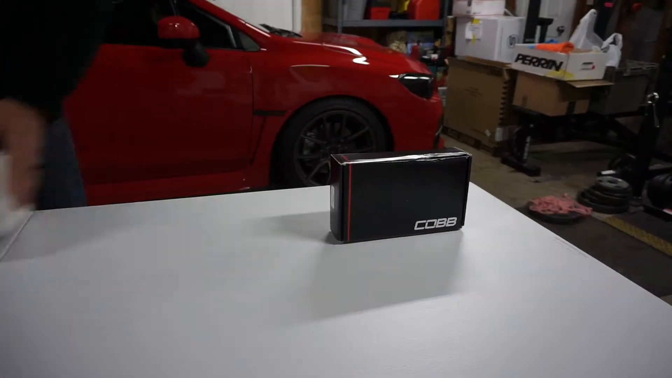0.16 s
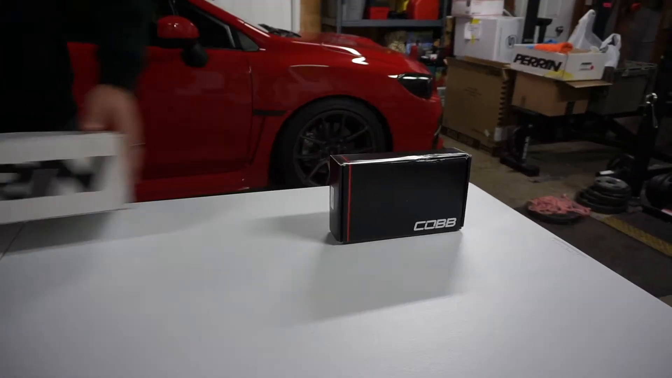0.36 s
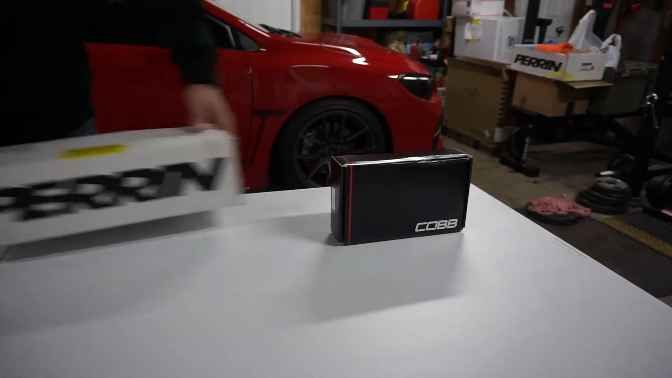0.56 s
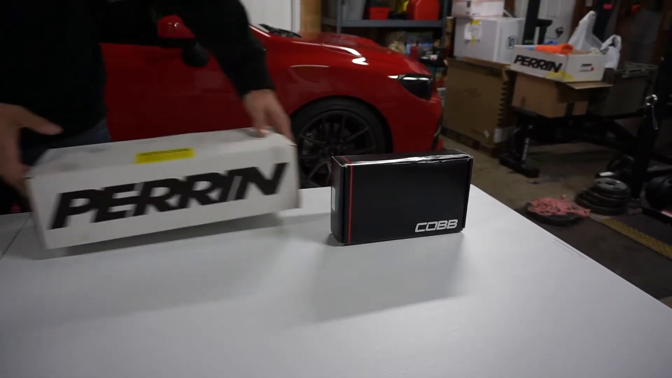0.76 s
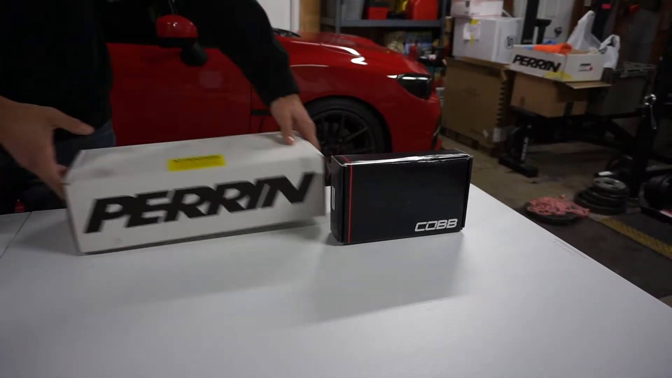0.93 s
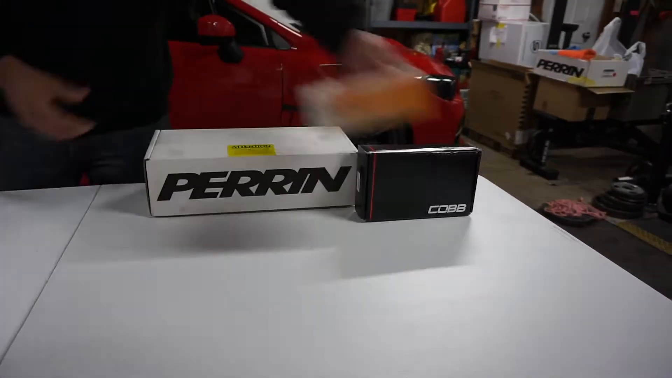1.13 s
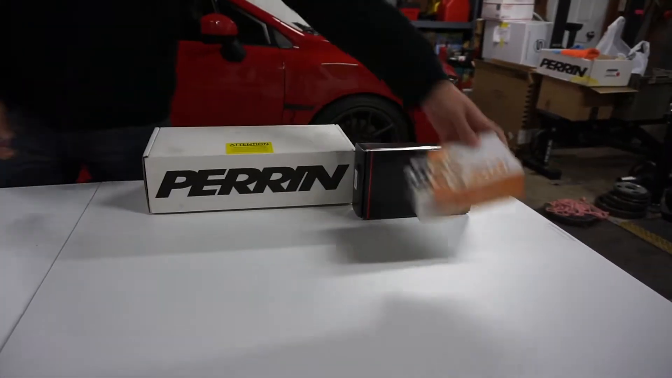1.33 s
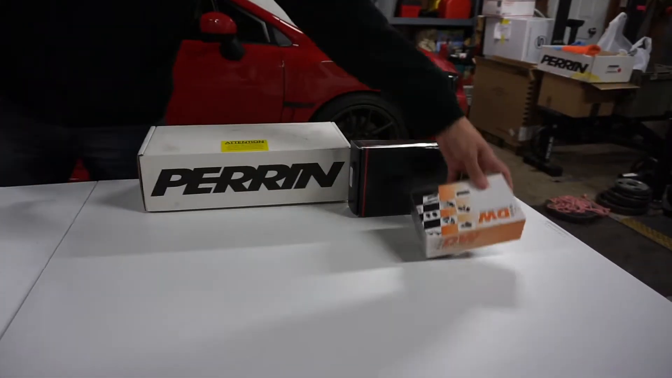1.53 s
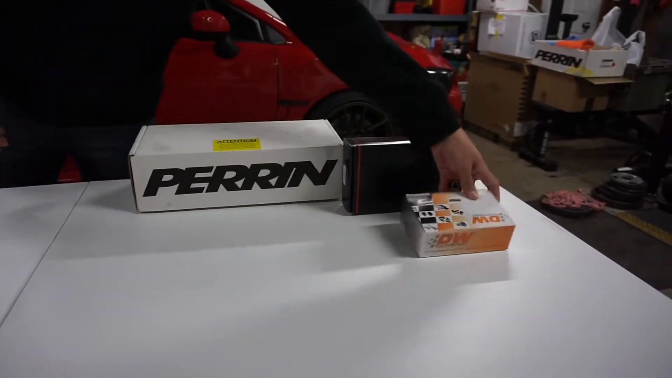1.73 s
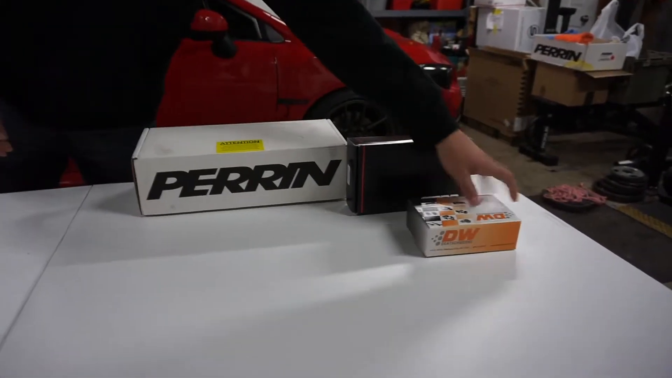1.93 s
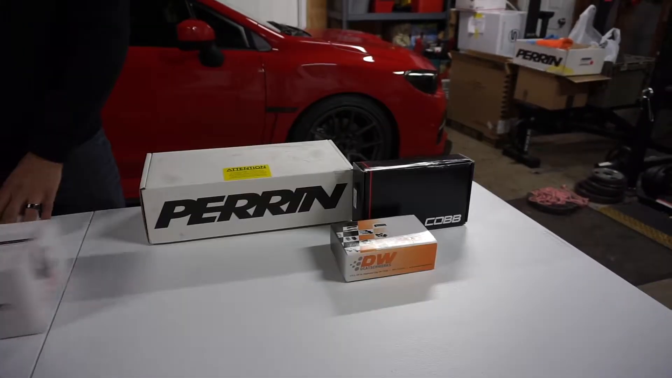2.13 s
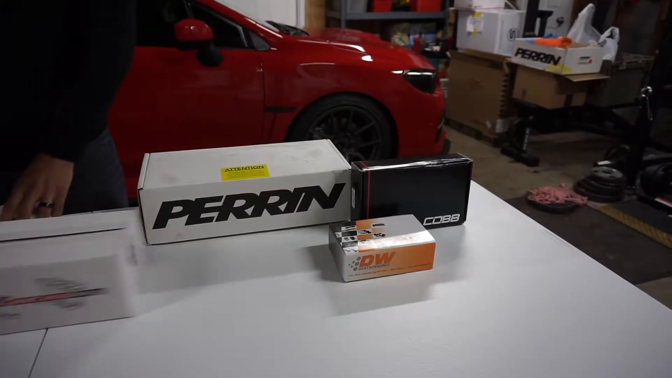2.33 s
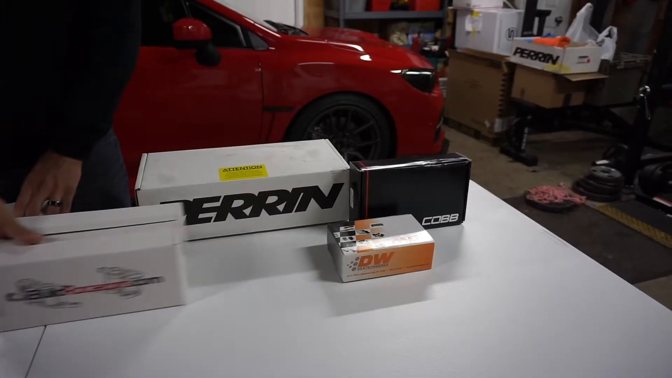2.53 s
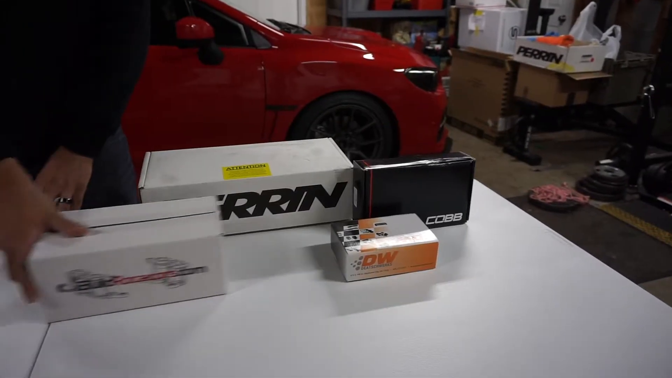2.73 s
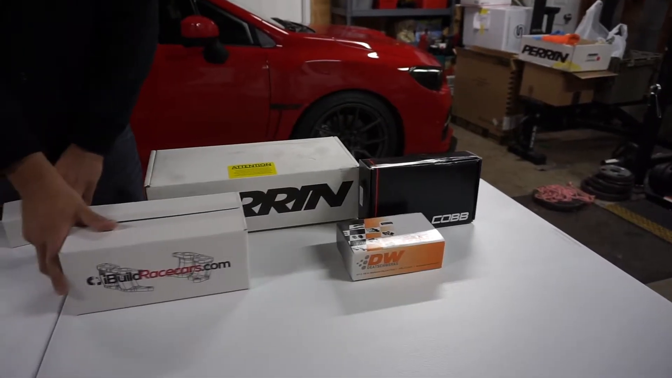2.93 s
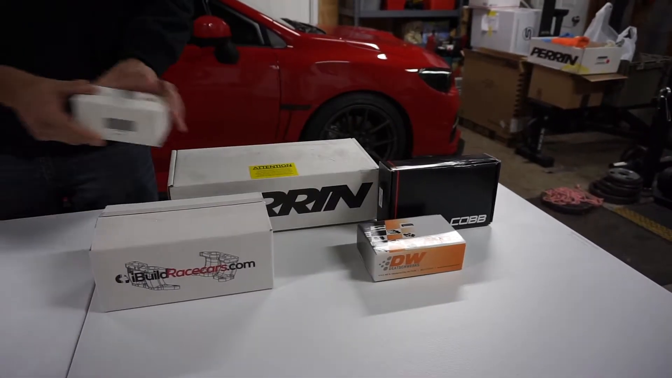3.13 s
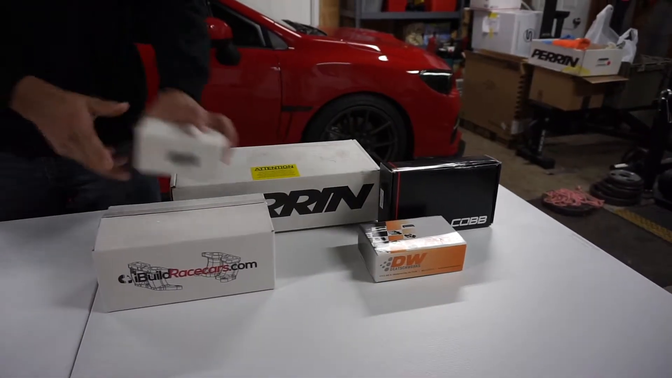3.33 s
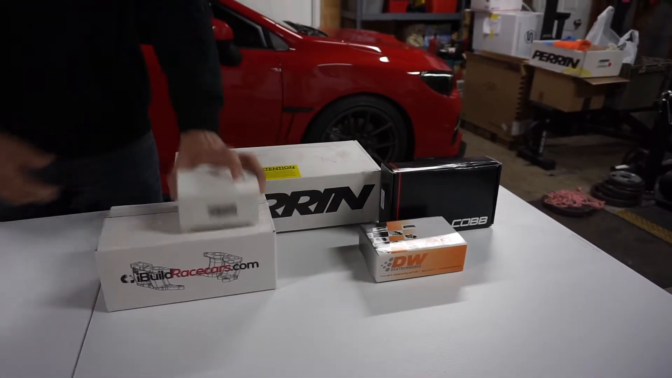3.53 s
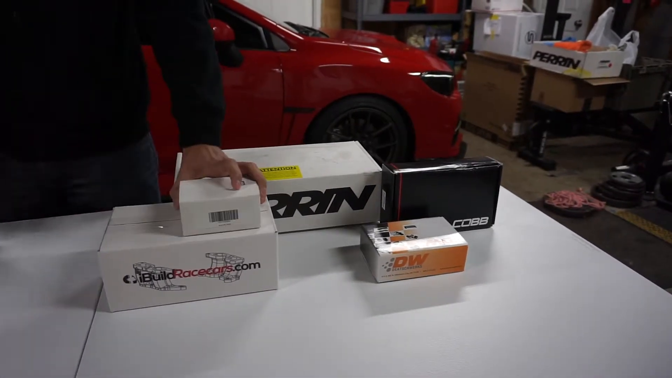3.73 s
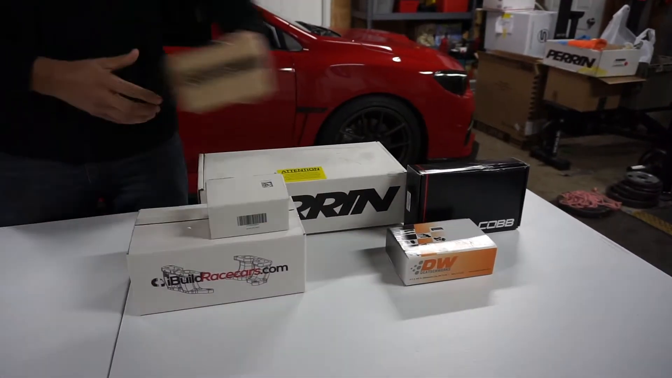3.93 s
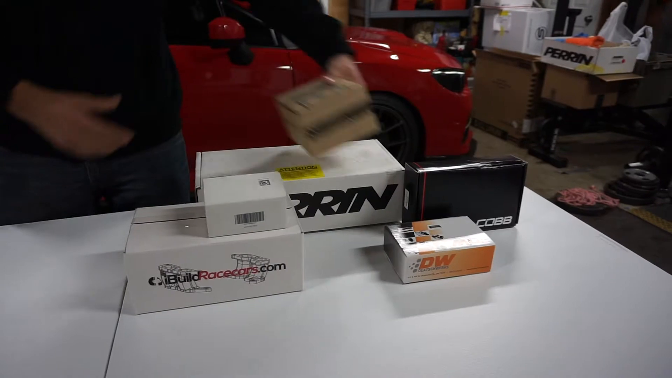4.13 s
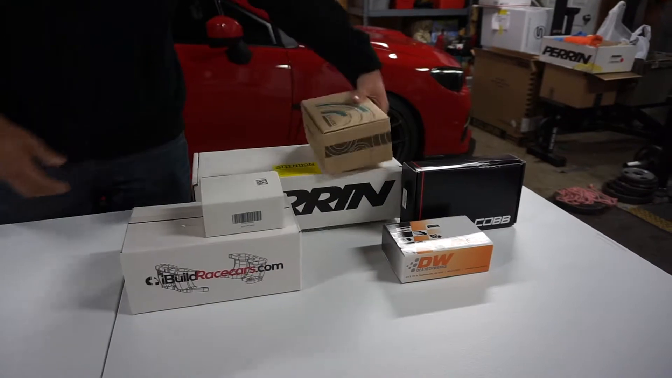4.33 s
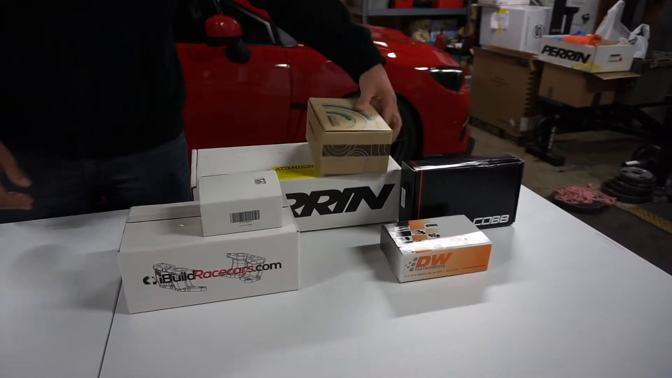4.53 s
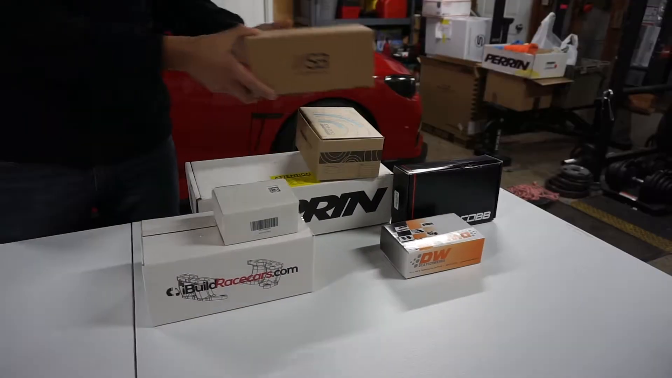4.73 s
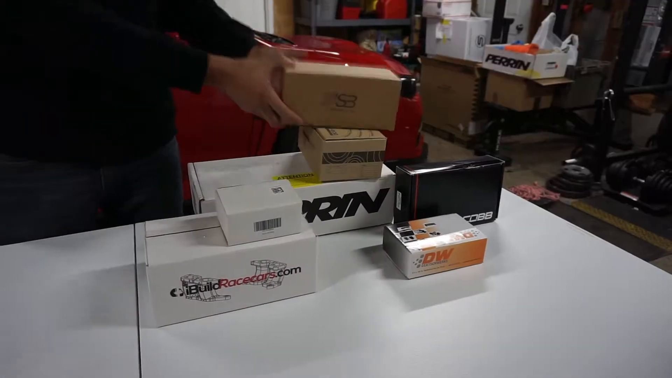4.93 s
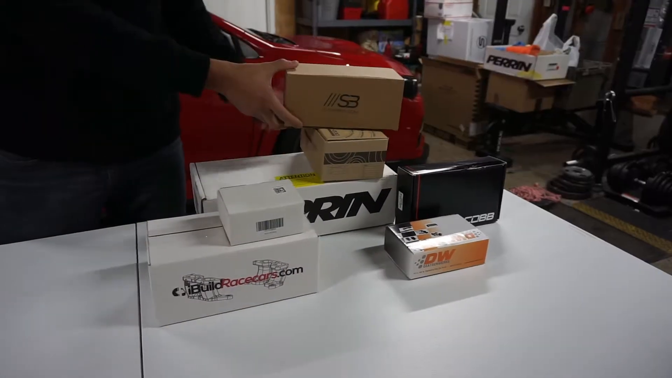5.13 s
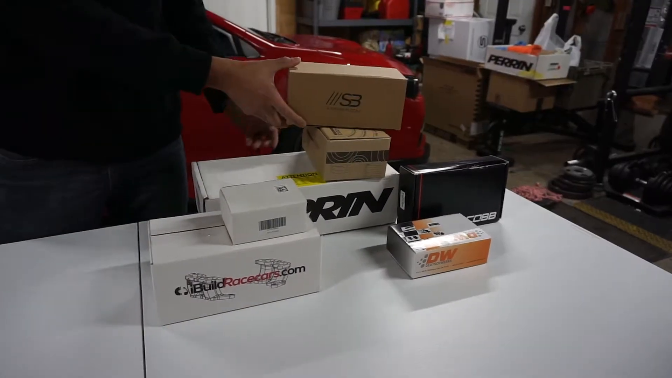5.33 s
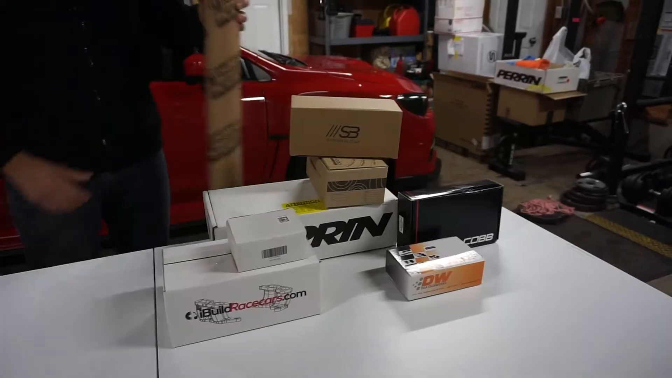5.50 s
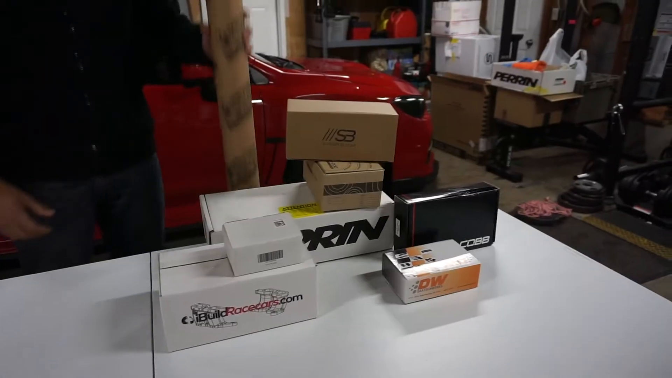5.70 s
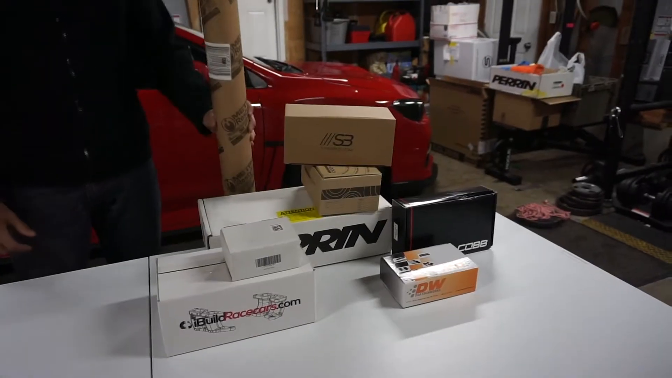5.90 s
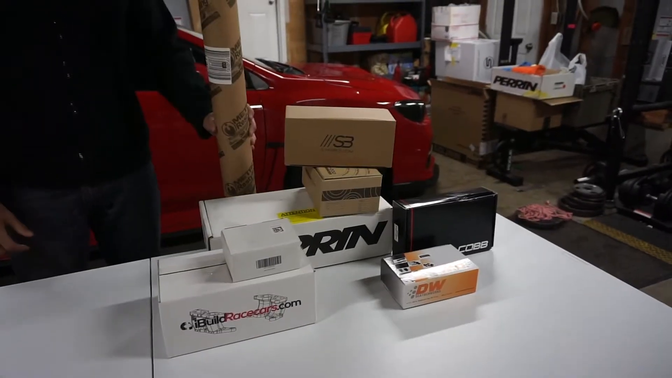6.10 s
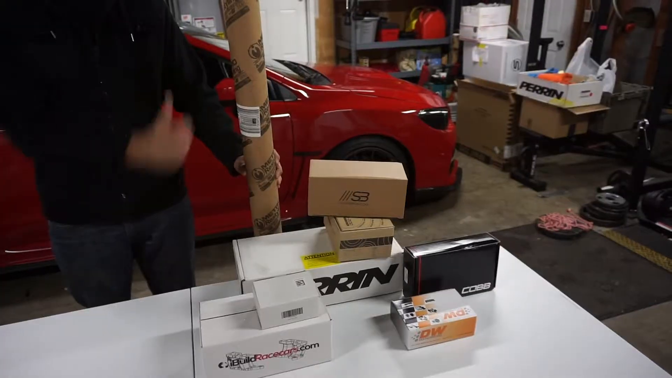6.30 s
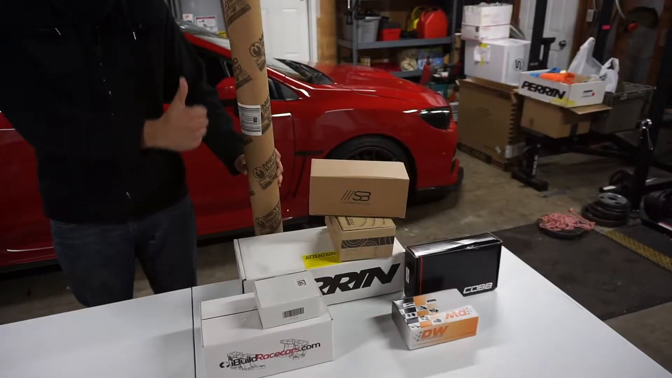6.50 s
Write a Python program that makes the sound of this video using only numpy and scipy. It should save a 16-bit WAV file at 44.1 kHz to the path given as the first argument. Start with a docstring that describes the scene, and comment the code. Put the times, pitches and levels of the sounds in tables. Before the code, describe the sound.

A cardboard box knocks down on a folding table right at the start, in a quick cluster of contacts slightly to the right. A softer one lands on the left at 1 second, and a third thuds at 1.6 and knocks sharply at 1.8. From about 2.1 seconds a box is shoved across the top on the left, hissing and juddering as it slows, then drops flat with a loud thud at 2.8. Another lands with a double knock at 3.6. Lighter bumps and rubbing run from 4.3 to 4.6, and a firm knock with a tiny squeak comes at 5. At 5.9 a long cardboard tube is stood on end, rocking briefly with a hollow boom that fades. Fingers lightly tap, flick and rub the card between blows. Everything is heard nearby in stereo, with short garage reflections and faint steady room air.

```python
"""Cardboard boxes put down one by one on a folding table in a garage, heard in stereo from nearby.
Each lands edge by edge, its walls ringing and buzzing, and the big ones rock before they settle.
One is shoved across the top, hissing and juddering as it slows, until it drops flat. A long cardboard
tube is stood on end and its air column booms. Between the blows hands tap and rub the card;
behind them are the reflections of the garage and its faint air."""
import sys
import numpy as np
from scipy import signal
from scipy.fft import rfft, irfft, next_fast_len
from scipy.io import wavfile
from scipy.ndimage import uniform_filter1d

SR = 44100
rng = np.random.default_rng(int(sys.argv[2]) if len(sys.argv) > 2 else 0)


def to_wav(sig):
    """Store sig (one row per channel, or 1-D mono) as 16-bit WAV at the path in sys.argv[1].

    Samples outside -1..1 are clipped; the rate is SR.
    """
    pcm = np.clip(np.atleast_2d(sig), -1, 1) * 32767
    pcm = np.round(pcm).astype(np.int16)
    wavfile.write(sys.argv[1], SR, pcm.T)  # frames by channels


N = 289204
TIME = np.arange(N) / SR
CUTOFF_HZ = 11150

# an edge, a face or a finger touches down: t/s, object, knock peak/dB, thud/dB, crack/dB
TOUCHDOWNS = [(0.002, "black", -27.5, -29.5, -48), (0.02, "black", -22.5, -43, -54.5),
              (0.087, "black", -20, -42, -43.5), (0.131, "black", -25, -53, -69),
              (0.205, "black", -36.5, -67, -62), (0.444, "finger", -52, -49, -78),
              (0.612, "finger", -34, -65, -57.5), (0.979, "long", -38, -31, -49.5),
              (0.991, "long", -26, -32, -49), (1.316, "finger", -43.5, -49, -63),
              (1.444, "finger", -45, -48, -60), (1.475, "finger", -51, -62, -59.5),
              (1.6, "glossy", -24.5, -24.5, -48.5), (1.645, "glossy", -53, -35, -76),
              (1.755, "glossy", -13.5, -34, -28.5), (1.825, "glossy", -23, -35, -49),
              (1.842, "glossy", -28.5, -31, -47), (2.7934, "wide", -15, -18.5, -30),
              (3.16, "finger", -45, -64, -62), (3.5855, "small", -15, -23, -42),
              (3.622, "small", -17, -24.5, -46.5), (3.904, "finger", -65, -68, -55),
              (4.302, "brown", -34, -32, -54.5), (4.381, "brown", -33.5, -34, -53.5),
              (4.452, "brown", -26.5, -60, -45.5), (4.538, "brown", -23.5, -31.5, -40),
              (4.557, "brown", -25, -39, -46.5), (4.63, "brown", -28, -32, -74),
              (4.98, "top", -19, -27.5, -31.5), (4.99, "top", -21.5, -26.5, -38.5),
              (5.9044, "tube", -14.5, -22.5, -31.5), (6.381, "finger", -59, -72, -67.5),
              (6.469, "finger", -49, -60, -58)]


def contacts(name):
    """One object's contacts: t/s, knock/dB, thud/dB, crack/dB."""
    return [(s, *levels) for s, who, *levels in TOUCHDOWNS if who == name]


# the modes each box rings with: f/Hz, level/dB, t60/s
BLACK_MODES = [(204, -7, 0.085), (333, -14, 0.12), (499, 6.5, 0.042), (588, -5.5, 0.092), (915, -6, 0.047),
               (1365, -15, 0.054), (2160, -4.5, 0.017)]
LONG_MODES = [(95, -26, 0.069), (198, -2.5, 0.13), (367, -5, 0.036), (580, -2, 0.03), (950, -2.5, 0.023)]
GLOSSY_MODES = [(127.5, -6.5, 0.32), (198, -2, 0.11), (406, 2.5, 0.029), (570, 4, 0.033), (903, 1, 0.021),
                (1430, -5, 0.015), (2470, 0.5, 0.011), (2760, 4, 0.012), (2880, -19, .14),
                (3920, -2, 0.0094)]
WIDE_MODES = [(138.7, 4.5, 0.12), (208, -0.5, 0.15), (318, -7, 0.055), (489, 0, 0.046), (650, 1, 0.1),
              (883, -7, 0.09)]
SMALL_MODES = [(186, -24, 0.11), (250, -3.5, 0.084), (354, 2, 0.069), (515, 0.5, 0.074), (845, -8, .04),
               (997, -9, 0.086), (2520, -19, 0.013)]
BROWN_MODES = [(114, -4.5, 0.04), (188, -1, 0.051), (296, -7, 0.042), (404, -4.5, 0.097), (558, 0.5, 0.039),
               (852, -2, 0.037)]
TOP_MODES = [(109, -9, 0.19), (194, -5.5, 0.075), (284, -10, 0.033), (477, -5, 0.056), (740, -19, 0.024),
             (1254, 1, 0.027), (1680, -27, 0.016)]
# the dense buzz of each box's walls: f/Hz, level/dB
BLACK_BUZZ = [(60, -1), (190, 4), (350, -7), (520, -3.5), (850, -15.5), (1700, -21), (2400, -18.5),
              (5000, -31.5), (10500, -29.5)]
LONG_BUZZ = [(50, -11), (130, 10), (200, -1), (330, -8.5), (600, -18), (1400, -23.5), (2700, -20.5),
             (5500, -33.5), (10500, -31)]
GLOSSY_BUZZ = [(55, -14), (130, 1), (270, -0.5), (500, -1), (1000, -12), (1900, -18.5), (2900, -19),
               (3600, -23.5), (6000, -32.5), (10500, -28)]
WIDE_BUZZ = [(45, -18), (135, -7), (260, -2), (600, -13), (1000, -20), (1500, -24.5), (2600, -22.5),
             (4000, -33), (6000, -35.5), (10500, -33)]
SMALL_BUZZ = [(60, -21), (120, -3.5), (180, -3), (250, 4), (340, -3.5), (540, -4.5), (750, -16),
              (1050, -16), (1600, -20.5), (2500, -27.5), (4500, -35.5), (10500, -35)]
BROWN_BUZZ = [(50, -6), (130, -2), (300, 2), (600, -6.5), (1300, -16.5), (2300, -15.5), (5000, -31),
              (10500, -28.5)]
TOP_BUZZ = [(45, -17), (90, 0), (200, 1.5), (450, -5.5), (800, -8.5), (1500, -17.5), (2700, -23),
            (5500, -36), (10500, -34)]


def boxes():
    """Seven boxes land in turn, left and right of the microphone; some of their tails stop short."""
    long_hits = rocking(contacts("long"), count=3, gap_s=0.0125, softer_db=(8, 6, -1), loss_db=2)
    wide_hits = rocking(contacts("wide"), count=3, gap_s=0.0163, softer_db=(8, 5.5, 12), loss_db=0.3)
    top_hits = rocking(contacts("top"), count=3, gap_s=0.0275, softer_db=(8.5, 1.5, 4), loss_db=2)
    black = blows(contacts("black"), BLACK_MODES, BLACK_BUZZ, buzz_db=-4.5, buzz_t60=0.11,
                  crack_t60=0.096, crest_db=10, pan_db=-2.5, lead_ms=-0.022, give_s=0.00067)
    long = blows(long_hits, LONG_MODES, LONG_BUZZ, buzz_db=0.5, buzz_t60=0.046,
                 crack_t60=0.13, crest_db=9.5, pan_db=4.5, lead_ms=0.1, give_s=0.00091)
    glossy = blows(contacts("glossy"), GLOSSY_MODES, GLOSSY_BUZZ, buzz_db=2, buzz_t60=0.087,
                   crack_t60=0.015, crest_db=9.5, pan_db=-3.2, lead_ms=-0.024, give_s=0.00049)
    wide = blows(wide_hits, WIDE_MODES, WIDE_BUZZ, buzz_db=0.5, buzz_t60=0.085,
                 crack_t60=0.075, crest_db=8.5, pan_db=6, lead_ms=0.068, give_s=0.00077)
    small = blows(contacts("small"), SMALL_MODES, SMALL_BUZZ, buzz_db=-2.5, buzz_t60=0.095,
                  crack_t60=0.12, crest_db=10, pan_db=3, lead_ms=0.03, give_s=0.0009, lowest_hz=55)
    brown = blows(contacts("brown"), BROWN_MODES, BROWN_BUZZ, buzz_db=0, buzz_t60=0.12,
                  crack_t60=0.074, crest_db=8.5, pan_db=-1, lead_ms=0.0035, give_s=0.00094)
    top = blows(top_hits, TOP_MODES, TOP_BUZZ, buzz_db=6.5, buzz_t60=0.093,
                crack_t60=0.11, crest_db=8, pan_db=-1.7, lead_ms=0.0081, give_s=0.0009)
    return (in_garage(black, BLACK_BUZZ, wet_db=-5.5, bass_db=-2) * until(0.236)
            + in_garage(long, LONG_BUZZ, wet_db=-3, bass_db=-2) * until(1.137)
            + in_garage(glossy, GLOSSY_BUZZ, wet_db=-2.5, bass_db=-6)
            + in_garage(wide, WIDE_BUZZ, wet_db=-3, bass_db=-5.5) * until(3.073)
            + in_garage(small, SMALL_BUZZ, wet_db=-6.5, bass_db=-1)
            + in_garage(brown, BROWN_BUZZ, wet_db=-3.5, bass_db=-5) * until(4.673)
            + in_garage(top, TOP_BUZZ, wet_db=-2, bass_db=-1.5))


def blows(hits, modes, walls, buzz_db, buzz_t60, crack_t60, crest_db, pan_db, lead_ms, give_s,
          lowest_hz=40, spread_db=3):
    """Each contact rings the modes and buzzes the walls; a flat landing thuds, a corner cracks."""
    t, out = TIME[:SR // 4], np.zeros((2, N + SR))
    hz, mode_db, t60 = np.transpose(modes)[:, :, None]
    ringing = np.sin(2 * np.pi * hz * t) * from_db(mode_db - 60 * t / t60)
    pressed = 1 - np.exp(-t / give_s)   # card gives way, so the force takes a moment to build
    for s, knock_db, thud_db, crack_db in hits:
        ring = from_db(spread_db * rng.standard_normal(len(modes))) @ ringing
        buzz = from_db(buzz_db) * coloured(rng.standard_normal(len(t)), walls)
        thud = (lowest_hz, 300, thud_db, buzz_t60, 0)
        knock = (300, 1500, knock_db - crest_db, buzz_t60, pan_db / 2)
        crack = (1500, 12000, crack_db, crack_t60, pan_db)
        start = round(s * SR)
        for low_hz, high_hz, level_db, decay_s, pan in (thud, knock, crack):
            vibration = pressed * (buzz * from_db(-60 * t / decay_s) - ring)
            part = bandpass(vibration, low_hz, high_hz, order=3)
            part *= from_db(level_db) / np.sqrt(np.mean(part[:SR // 33] ** 2))   # rms of the first 30 ms
            out[:, start:start + len(t)] += placed(part, pan, lead_ms)
    return out[:, :N]


def rocking(hits, count, gap_s, softer_db, loss_db):
    """After its last contact the object rocks in evenly spaced rebounds, losing loss_db each time."""
    s, *levels = hits[-1]
    rebound_db = np.subtract(levels, softer_db)   # knock, thud, crack
    return hits + [(s + gap_s * (k + 1), *(rebound_db - loss_db * k)) for k in range(count)]


# the modes of the tube's card: f/Hz, level/dB, t60/s
TUBE_MODES = [(125, -27, .09), (192, 6, 0.059), (274, -4.5, 0.2), (319, -5.5, 0.3), (497, -3, 0.058),
              (737, -1, 0.049), (1170, -16, 0.074)]
# the buzz of its wall: f/Hz, level/dB
TUBE_BUZZ = [(55, -27), (100, -5), (185, -4), (240, -5), (310, 3.5), (480, -12), (750, -13), (1400, -13),
             (1900, -21.5), (2700, -18), (4500, -29), (7000, -37.5), (10500, -39)]


def tube():
    """The tube is stood on end a little to the left, rocks and booms."""
    hits = rocking(contacts("tube"), count=5, gap_s=0.02, softer_db=(9.5, 9, 6), loss_db=0)
    card = blows(hits, TUBE_MODES, TUBE_BUZZ, buzz_db=-2, buzz_t60=0.19,
                 crack_t60=0.031, crest_db=6.5, pan_db=2.5, lead_ms=0.032, give_s=0.00023, lowest_hz=100)
    return (in_garage(card, TUBE_BUZZ, wet_db=2, bass_db=-1) + boom()) * until(6.208)


# the modes of the air inside the tube: f/Hz, level/dB, t60/s
AIR_COLUMN = [(290.8, -15.5, 0.44), (329, -25, 0.57)]


def boom(build_s=0.012):
    """The landing pumps the tube's air column, which swells to a hollow note and dies away."""
    landing_s = contacts("tube")[0][0]
    t = np.maximum(TIME - landing_s, 0)
    note = sum(np.sin(2 * np.pi * hz * t) * from_db(db - 60 * t / t60) for hz, db, t60 in AIR_COLUMN)
    return -note * (1 - np.exp(-t / build_s))


# sliding card, the grind of its body and the hiss of its edge: f/Hz, level/dB
GRIND_SPECTRUM = [(45, -19), (100, -7.5), (300, -10.5), (550, -11), (800, -15.5), (1400, -21),
                  (2000, -22.5), (2700, -22), (4200, -28.5), (6000, -33), (11000, -29.5)]
HISS_SPECTRUM = [(1200, -12), (2500, -10.5), (4500, -7), (7000, -5.5), (9000, -0.5), (11000, -0.5)]


def slide(start_s=2.069, stop_s=2.8, slowing_s=0.488):
    """Card shoved over plastic, on the left: grind and hiss fade as it slows, while its edge rings."""
    speed = np.exp(-np.maximum(TIME - start_s, 0) / slowing_s)
    moving = until(stop_s) * (1 - until(start_s))
    chatter_times = 2.18 + np.cumsum([0, 0.033, 0.2, 0.1])   # a hard spell: attack, hold, release
    chatter = np.interp(TIME, chatter_times, [0, 1, 1, 0])
    grind = speed * from_db(-28) * friction(GRIND_SPECTRUM, grain_db=2)
    hiss_db = -32 - 5.5 * chatter   # a hopping box hisses less
    hiss = speed * from_db(hiss_db) * friction(HISS_SPECTRUM, grain_db=1.5)
    scrape = friction(GRIND_SPECTRUM, grain_db=5.5)
    edge = from_db(-45.5) * rms_one(resonance(scrape, hz=2630, width_hz=410))
    rubbing = placed(grind + edge, pan_db=2.5, lead_ms=0.1) + placed(hiss, pan_db=7.5, lead_ms=0.057)
    in_room = in_garage(rubbing * moving, GRIND_SPECTRUM, wet_db=-5.5) * until(3.073)
    return in_room + judder(speed, chatter) * moving


def judder(speed, chatter, full_speed_hz=156, light_db=-42, chatter_db=16, wobble_db=2):
    """The box sticks and slips ever more slowly, and each slip shakes the table top."""
    slip_hz = full_speed_hz * speed * (1 + 0.0302 * drift(60))
    slips = np.diff(np.floor(np.cumsum(slip_hz) / SR), prepend=0)
    shake = resonance(slips + 1e-18, hz=116, width_hz=66)
    shake /= np.sqrt(uniform_filter1d(shake ** 2, size=2000) + 1e-12)   # even level at any slip rate
    return shake * from_db(light_db + chatter_db * chatter + wobble_db * drift(30))


def friction(spectrum, grain_db):
    """Fibres catch and let go in tiny uneven bursts."""
    noise = rng.standard_normal(N)
    bursts = from_db(grain_db * drift(900) + grain_db / 2 * drift(70))
    return coloured(noise * bursts, spectrum)


# fingernails and flaps flick the card: t/s, level/dB
FLICKS = [(0.81, -41), (1.0392, -36), (1.8263, -36.5), (3.051, -32.5), (3.303, -30.5), (3.3222, -28.5)]


def snaps(edge_t60=0.0076, flick_t60=0.017, rise_s=0.00061, over_crack_db=11, ceiling_db=-27):
    """Struck edges and flicks: bursts of a few milliseconds, as bright as the hiss of sliding card."""
    t, out = TIME[:SR // 16], np.zeros((2, N))
    edges = [(s, min(crack_db + over_crack_db, ceiling_db), edge_t60, 0)
             for s, *_, crack_db in TOUCHDOWNS]
    flicks = [(s, level_db, flick_t60, 4.5) for s, level_db in FLICKS]
    for s, level_db, t60, pan_db in edges + flicks:
        envelope = (1 - np.exp(-t / rise_s)) * from_db(level_db - 60 * t / t60)
        burst = coloured(rng.standard_normal(len(t)), HISS_SPECTRUM) * envelope
        start = round(s * SR)
        out[:, start:start + len(t)] += placed(burst, pan_db, lead_ms=0.03)
    return in_garage(out, HISS_SPECTRUM, wet_db=-12.5)


# the modes of card under a fingertip: f/Hz, level/dB, t60/s
FINGER_MODES = [(368, -11, 0.021), (632, -4, 0.13), (860, 10, 0.017), (2380, 9, 0.012)]
# the buzz of the tapped wall: f/Hz, level/dB
FINGER_BUZZ = [(100, 2), (600, -6), (1500, -10.5), (2600, -5.5), (5000, -16.5), (11000, -5)]


def fingers():
    """Light taps near the centre as the boxes are gripped and let go."""
    taps = blows(contacts("finger"), FINGER_MODES, FINGER_BUZZ, buzz_db=2, buzz_t60=0.038,
                 crack_t60=0.049, crest_db=8.5, pan_db=1, lead_ms=0.034, give_s=0.00065)
    return in_garage(taps, FINGER_BUZZ, wet_db=-3.5, bass_db=-17)


# hands and card rubbing on card: t/s, half length/s, grind/dB, hiss/dB
RUB_STROKES = [(0.075, 0.031, -39.5, -56), (1.02, 0.06, -46.5, -60), (1.244, 0.18, -56.5, -66.5),
               (1.578, 0.045, -57, -61.5), (1.722, 0.038, -57, -59), (1.8, 0.043, -36, -74),
               (2.792, .004, -29, -39), (3.221, 0.023, -60, -43.5), (3.306, 0.028, -50, -46),
               (3.881, 0.086, -59, -59.5), (4.427, 0.066, -44, -53), (4.527, 0.012, -38, -49.5),
               (4.964, 0.0087, -41, -49.5)]


def rubs():
    """Short swells of friction under hands and between boxes, their hiss well to the left."""
    grind_gain, hiss_gain = np.zeros((2, N))
    for s, half_s, grind_db, hiss_db in RUB_STROKES:
        near = np.abs(TIME - s) < 3 * half_s
        swell = np.exp(-((TIME[near] - s) / half_s) ** 2)
        grind_gain[near] += from_db(grind_db) * swell
        hiss_gain[near] += from_db(hiss_db) * swell
    grind = placed(grind_gain * friction(GRIND_SPECTRUM, grain_db=4), pan_db=-1.5, lead_ms=0.048)
    hiss = placed(hiss_gain * friction(HISS_SPECTRUM, grain_db=4), pan_db=12, lead_ms=0.047)
    return in_garage(grind + hiss, HISS_SPECTRUM, wet_db=-4)


# a low drone, a faint rush, two resonances of a squeak of card, a soft rub:
# from t/s, to t/s, f/Hz, width/Hz, level/dB
NOISE_BANDS = [(1.125, 1.585, 107.7, 17.5, -45.5), (3.026, 4.227, 950, 470, -55),
               (4.949, 4.977, 1460, 260, -39), (4.956, 4.985, 674, 160, -39.5),
               (5.425, 5.602, 1240, 350, -61)]


def swells():
    """Small sounds around the table: each is noise in one resonance, swelling and fading."""
    noise, out = diffuse(N), np.zeros((2, N))
    for start, stop, hz, width_hz, level_db in NOISE_BANDS:
        progress = np.clip((TIME - start) / (stop - start), 0, 1)
        arch = np.sqrt(np.abs(np.sin(np.pi * progress)))
        out += from_db(level_db) * rms_one(resonance(noise, hz, width_hz)) * arch
    return out


# the garage's decay by band: from f/Hz, to f/Hz, t60/s
ROOM_DECAY = [(20, 167, 0.68), (340, 1350, 0.63), (1660, 4050, 0.62), (4600, 9900, 0.56)]
# resonances that stand out of its reflections: f/Hz, width/Hz, level/dB
ROOM_PEAKS = [(212, 16, 8.5), (277, 9.1, 7), (316.6, 6.4, 10), (363, 16, 5), (540, 75, 5), (931, 51, 7),
              (1207, 49, 5.5), (1367, 63, 3.5), (1570, 8.6, 6), (1970, 60, 2.5), (2420, 110, 1),
              (2730, 34, 0)]


def in_garage(x, spectrum, wet_db, bass_db=3.5, build_s=0.0046):
    """The room stores each band's energy and lets it out as dense reflections in the source's colour."""
    first, last = np.flatnonzero(x[0])[[0, -1]]
    span, out = slice(first, min(last + SR, N)), x.copy()
    size = span.stop - first
    padded = next_fast_len(size)
    hz = np.fft.rfftfreq(padded, 1 / SR)
    peaks_db = sum(db / (1 + (2 * (hz - centre) / width) ** 2) for centre, width, db in ROOM_PEAKS)
    reflections = rfft(diffuse(padded)) * from_db(at_hz(spectrum, hz) + peaks_db)
    for band, (low, high, t60) in enumerate(ROOM_DECAY):
        energy = bandpass(x[0, span] + 1e-12, low, high) ** 2
        decay, build = from_db(-120 / (t60 * SR)), np.exp(-1 / (build_s * SR))
        for keep in (decay, build):
            energy = signal.lfilter([1 - keep], [1, -keep], energy + 1e-24)
        share = 1 / (1 + (hz / high) ** 4) - 1 / (1 + (hz / low) ** 4)
        wash = rms_one(irfft(reflections * share, padded)[:, :size])
        out[:, span] += from_db(wet_db + bass_db * (band == 0)) * np.sqrt(energy) * wash
    return out


# the steady air of the garage: f/Hz, level/dB
ROOM_TONE = [(15, -43), (25, -8.5), (59, -3), (92, 2), (141, -4.5), (223, -6), (492, -17), (603, -18),
             (840, -18.5), (1140, -21.5), (1850, -28), (3500, -30.5), (5530, -32.5), (10200, -32.5),
             (11000, -35.5), (14300, -71), (22000, -120)]


def garage_air(level_db=-48.5, wander_db=0.78):
    """Faint room tone all around the microphone, its level wandering slightly."""
    return from_db(level_db + wander_db * drift(2.27)) * coloured(diffuse(N), ROOM_TONE)


# diffuse sound at the two sides of the microphone: f/Hz, correlation (-1 to 1)
COHERENCE = [(100, 1), (250, 0.95), (500, 0.84), (1000, 0.43), (2000, 0.066), (4000, -.1), (11000, 0)]


def diffuse(size):
    """Stereo white noise, alike on both sides in the bass only."""
    padded = next_fast_len(size)
    alike = np.clip(at_hz(COHERENCE, np.fft.rfftfreq(padded, 1 / SR)), -0.999, 0.999)
    mid, side = rfft(rng.standard_normal((2, padded)))
    pair = np.sqrt(1 + alike) * mid + np.sqrt(1 - alike) * side * [[1], [-1]]
    return rms_one(irfft(pair, padded)[:, :size])


def placed(x, pan_db, lead_ms):
    """A source to the left is louder there and reaches the right of the microphone later."""
    t = TIME[:len(x)]
    delayed = np.interp(t - lead_ms / 1000, t, x)
    return np.array([x * from_db(pan_db / 2), delayed * from_db(-pan_db / 2)])


def coloured(x, spectrum):
    """Give a noise its spectrum; rms 1."""
    size = next_fast_len(x.shape[-1])
    hz = np.fft.rfftfreq(size, 1 / SR)
    gain = from_db(at_hz(spectrum, hz)) * (hz < CUTOFF_HZ)
    return rms_one(irfft(rfft(x, size) * gain, size)[..., :x.shape[-1]])


def drift(rate_hz):
    """A smooth random wander; rms 1."""
    knots = rng.standard_normal(N // 4)
    return rms_one(np.interp(TIME * rate_hz, np.arange(len(knots)), knots))


def until(s):
    """A gate that shuts over the 3 ms before time s."""
    return np.clip((s - TIME) / 0.003, 0, 1)


def resonance(x, hz, width_hz):
    """Pass one band around hz."""
    return bandpass(x, hz - width_hz / 2, hz + width_hz / 2)


def bandpass(x, low_hz, high_hz, order=2):
    """Pass the band between two edges."""
    return signal.sosfilt(signal.butter(order, [low_hz, high_hz], "band", fs=SR, output="sos"), x)


def at_hz(points, hz):
    """Read a table on a log-frequency axis."""
    f, value = np.transpose(points)
    return np.interp(np.log(np.maximum(hz, 1)), np.log(f), value)


def from_db(db):
    """Decibels to gain."""
    return 10 ** (np.asarray(db) / 20)


def rms_one(x):
    """Scale to rms 1."""
    return x / np.sqrt(np.mean(x ** 2) + 1e-20)


def scene():
    """Boxes, tube and hands at the table, with the air of the garage behind them."""
    return boxes() + tube() + fingers() + snaps() + slide() + rubs() + swells() + garage_air()


def record(dry):
    """The microphone's signal, with the top treble cut steeply."""
    return signal.sosfilt(signal.ellip(12, 0.2, 70, CUTOFF_HZ, fs=SR, output="sos"), dry)


dry = scene()
out = record(dry)
to_wav(out)
```